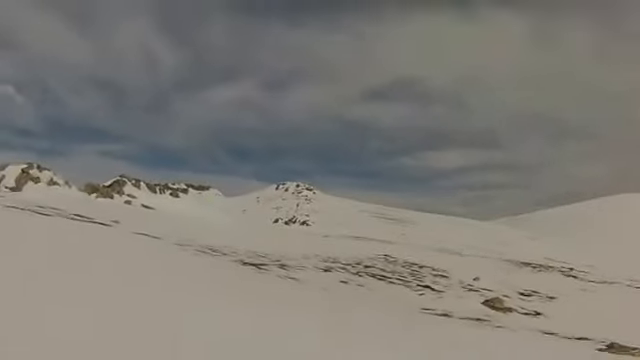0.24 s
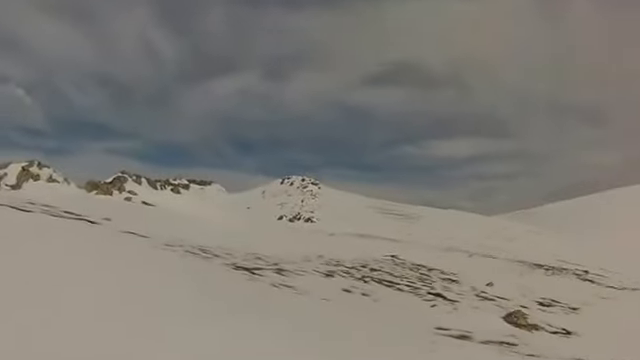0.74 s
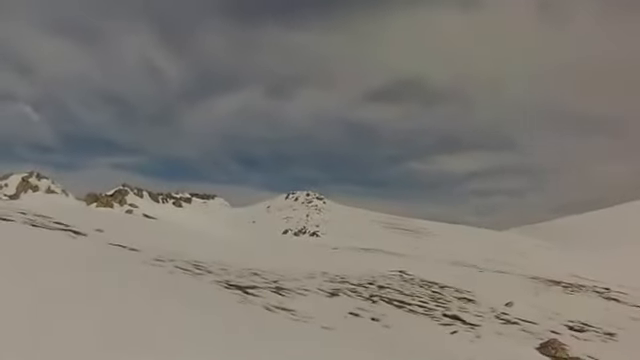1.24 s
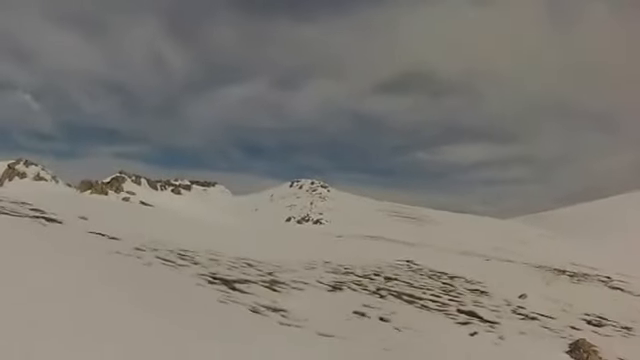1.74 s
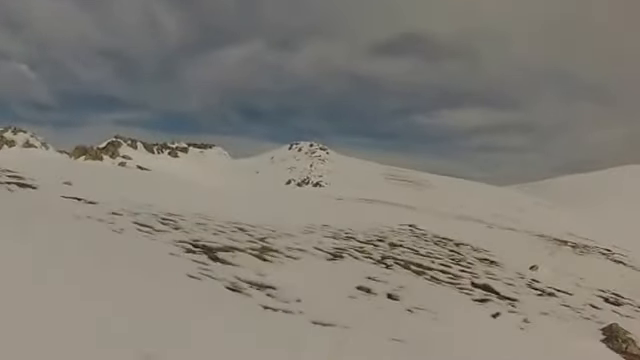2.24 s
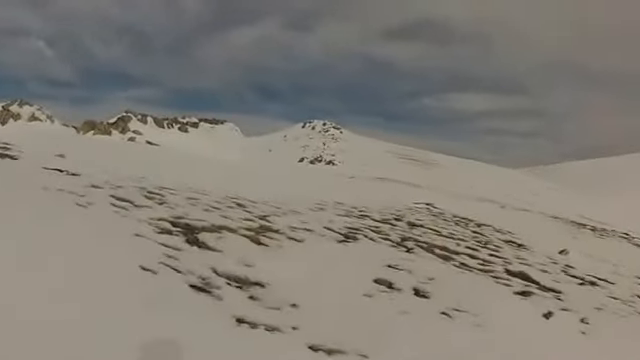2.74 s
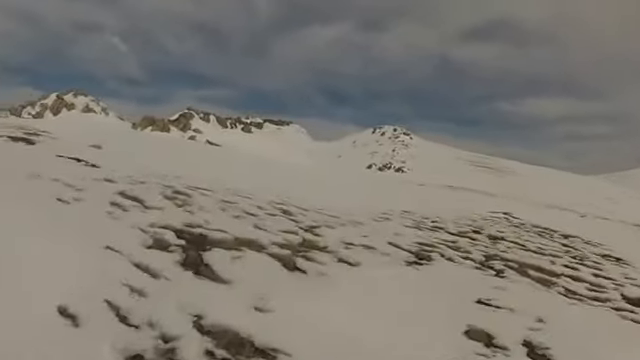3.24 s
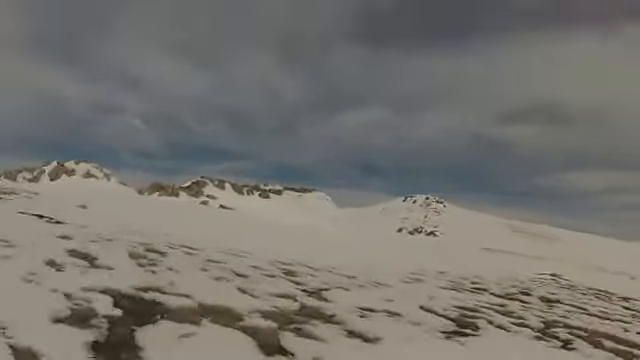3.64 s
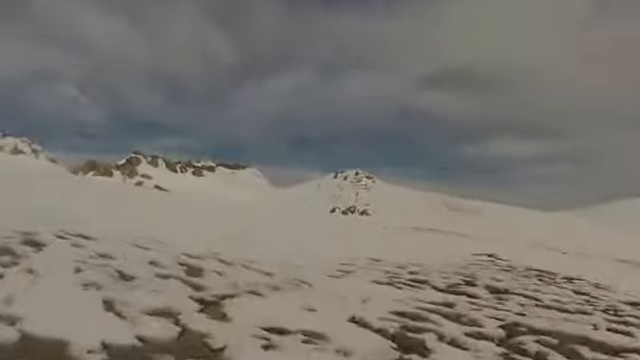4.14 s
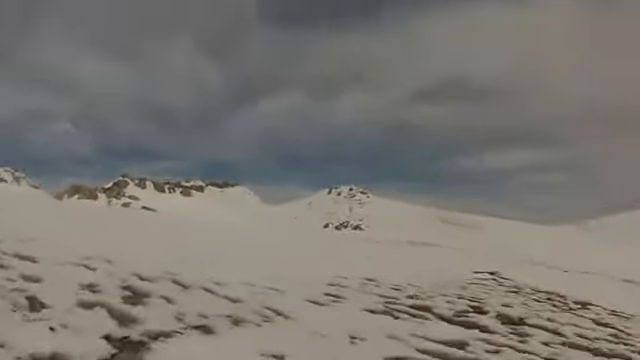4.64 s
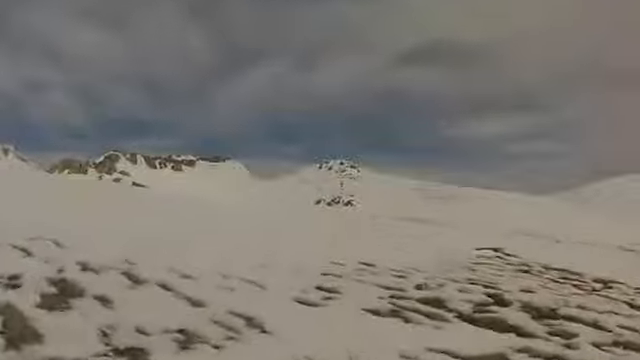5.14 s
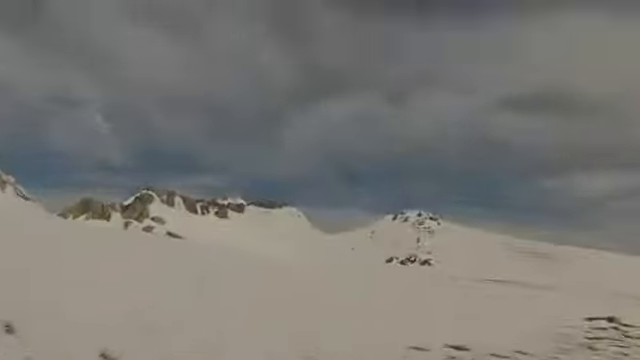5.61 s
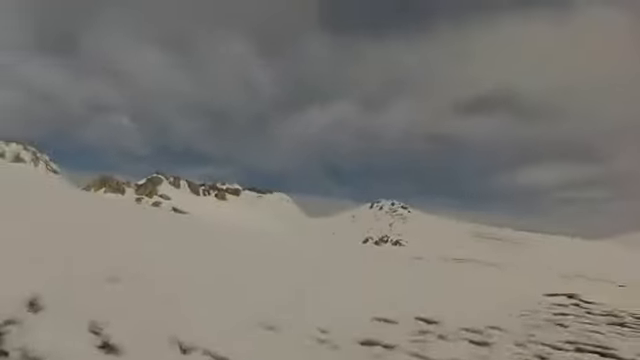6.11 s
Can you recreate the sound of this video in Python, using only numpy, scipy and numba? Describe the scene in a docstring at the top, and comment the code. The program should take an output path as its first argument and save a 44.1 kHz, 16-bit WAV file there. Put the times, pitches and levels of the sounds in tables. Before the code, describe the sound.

Boomy, muffled ride over hard snow: fat tyres drumming and crunching, mount jolting, plastic case rattling and clicking irregularly, with overloaded crackle on big bumps.

```python
"""A camera in a closed housing rides a wide-tyred bicycle over crusty snow for about six seconds.
From the start, shaped noise shakes the frame, noise-driven resonances drum in tyre and mount,
and random snaps crunch through the housing. Smooth jolts and ringing knocks soon join and go on throughout.
Gliding sines squeak near 0.6, 2.9 and 3.6 s. All along, a gain control moving in small steps
ducks after big swings and crackles while it moves."""
import sys
import numpy as np
from scipy import signal
from scipy.fft import rfft, irfft
from scipy.io import wavfile
from scipy.ndimage import uniform_filter1d
from numba import njit

SR = 44100
rng = np.random.default_rng(int(sys.argv[2]) if len(sys.argv) > 2 else 0)


def unload_audio(sound):
    """Save the sound as a 16-bit wav file, at the path given as the first command line argument."""
    columns = np.transpose(np.atleast_2d(sound))
    # keep every value between -1 and 1, then stretch to whole-number steps
    steps = np.round(np.clip(columns, -1, 1) * 32767)
    wavfile.write(sys.argv[1], SR, steps.astype(np.int16))


N = 280917

# Spectrum of the frame shake: (frequency [Hz], relative density [dB])
SHAKE_SPECTRUM = [(8, -17), (14, -3.5), (27, 2.5), (60, -6), (100, -15.5), (170, -25.5), (300, -58)]
# Level of the frame shake, with its lulls: (time [s], level [dB])
SHAKE_LEVEL = [(.04, -13.5), (.08, -30), (.2, -16), (.5, -17), (.6, -29), (.9, -15), (1.13, -18),
               (1.23, -24.5), (1.32, -15), (1.9, -21), (2.1, -17.5), (2.35, -18), (2.55, -26), (2.7, -22.5),
               (2.93, -22.5), (3.05, -13), (3.36, -19), (3.42, -23.5), (3.52, -17.5), (4.5, -20.5),
               (4.6, -20), (4.7, -17), (4.9, -21), (4.98, -26.5), (5.2, -21), (5.6, -16.5), (5.73, -16),
               (5.82, -19), (5.92, -20), (6.2, -17.5), (6.37, -21.5)]
# Resonances, two of the tyre then three of the mount: (frequency [Hz], pole width [Hz], level [dB])
MOUNT_MODES = [(122, 23, -6), (166.7, 40, 1), (209, 60, 0.5), (286.2, 89, -5.5), (398.4, 140, -17.5)]
# Level of the tyre drumming: (time [s], level [dB])
DRUM_LEVEL = [(.04, -25.5), (.08, -36), (.56, -33), (.65, -21), (.75, -27.5), (1.2, -33.5), (1.47, -22.5),
              (1.88, -39.5), (2, -27.5), (2.5, -32.5), (2.6, -18.5), (2.88, -20), (2.98, -24.5),
              (3.25, -26), (3.42, -34), (3.5, -15), (3.57, -26), (3.68, -19), (4.2, -36), (4.55, -21.5),
              (5, -25.5), (5.4, -22.5), (5.65, -22.5), (5.78, -39.5), (5.9, -24), (6.1, -27.5), (6.37, -25)]
# Level of the mount shudder at the usual bite: (time [s], level [dB])
SHUDDER_LEVEL = [(.05, -29.5), (.25, -28.5), (.55, -29), (.8, -24), (1.3, -27.5), (2, -26.5), (2.4, -26),
                 (2.62, -25.5), (2.75, -28), (3, -25.5), (3.9, -23), (4.15, -24.5), (4.55, -27.5),
                 (4.68, -22), (4.8, -25.5), (5.22, -24), (5.35, -24.5), (5.7, -26), (6.05, -21.5),
                 (6.37, -27)]
# How hard the tyres bite into the crust, heard as the crunch: (time [s], level [dB])
BITE_LEVEL = [(.04, -37), (.1, -43.5), (.55, -41.5), (.63, -31.5), (.72, -37.5), (.87, -40), (.98, -45.5),
              (1.25, -37.5), (1.5, -38), (1.85, -45), (2.02, -39), (2.18, -43.5), (2.6, -38), (2.72, -41.5),
              (3.15, -44.5), (3.25, -29), (3.32, -35), (3.41, -49), (3.5, -34), (3.64, -38.5), (3.73, -50),
              (3.9, -41.5), (4.15, -51.5), (4.32, -41.5), (4.42, -40), (4.55, -38), (4.78, -39),
              (4.88, -42.5), (5.22, -39.5), (5.35, -34), (5.6, -39.5), (5.78, -49.5), (5.88, -41.5),
              (5.96, -52.5), (6.2, -39), (6.37, -46.5)]
# Crispness of the crust at the usual bite: (time [s], upper-mode level [dB])
CRISPNESS = [(0, -11), (.6, -1.5), (1, -7.5), (2, -2.5), (3.1, -6.5), (3.3, -2.5), (3.55, -7), (3.66, 5),
             (3.8, 0), (4.4, -4), (4.7, -2), (5.1, -4.5), (5.35, -1), (5.6, -1), (6, 0.5), (6.37, -7.5)]
# Resonances of the housing, low to high: (frequency [Hz], pole width [Hz], level [dB])
HOUSING_MODES = [(494.7, 100, 2.5), (827.4, 210, 3), (1310.6, 396, -1.5), (1772, 250, -12.5),
                 (2202, 530, -8), (2606, 290, -23.5), (3390, 280, -30), (5950, 1300, -48)]
# Bumps that push the housing: (time [s], signed relative push, width at half height [ms])
JOLT_EVENTS = [(0.0118, -0.65, 2.9), (0.0333, -1.67, 1.87), (0.1153, 1, 2.35), (0.159, -1.04, 1.84),
               (0.2091, 0.99, 6.8), (0.322, -1.02, 2.4), (0.457, -0.73, 1.66), (0.658, 0.82, 1.93),
               (0.6785, 0.99, 4.7), (0.7301, -0.91, 1.75), (0.9066, -1.28, 5.2), (1.0246, 0.68, 13),
               (1.0821, -1.5, 1.5), (1.301, 1, 2.65), (1.494, -0.57, 7.3), (1.578, 0.72, 4.6),
               (1.612, -0.74, 1.87), (1.706, -1.5, 1.6), (1.7833, 0.76, 2.45), (1.9443, 0.54, 9),
               (1.9917, -0.71, 2.23), (2.0284, -0.81, 1.95), (2.1343, 1, 13.5), (2.352, -1.14, 12.6),
               (2.4344, 0.49, 2), (2.5778, -0.51, 1.5), (2.667, 0.62, 1.9), (2.6818, -0.93, 4.1),
               (2.856, -0.68, 2.08), (2.898, 0.91, 3.56), (3.3434, 1, 3.3), (3.4942, -0.51, 1.67),
               (3.5069, 1, 2.2), (3.5415, 0.72, 5.8), (3.6636, 0.92, 1.97), (3.6734, 0.72, 1.9),
               (3.692, -1.3, 14), (3.856, 0.77, 1.32), (3.943, 0.5, 2.35), (3.96, -1.33, 23),
               (4.011, 0.71, 12.6), (4.1068, 0.93, 1.39), (4.296, 0.38, 3.8), (4.332, -0.63, 6),
               (4.3497, -1.14, 1.26), (4.674, 0.17, 7.8), (4.6996, -0.29, 4.9), (4.8292, 0.79, 7),
               (4.8927, 0.76, 1.66), (4.9252, 0.66, 8.7), (5.073, 0.76, 2.7), (5.2133, -0.81, 1.6),
               (5.2323, -0.72, 3), (5.3545, -0.47, 2.3), (5.5352, 0.64, 1.8), (5.5732, 1, 1.58),
               (5.5828, -0.76, 1.85), (5.6614, -0.13, 6.8), (5.7441, -1.8, 11.8), (5.9189, 1, 4.9),
               (6.0198, 1, 1.46), (6.0801, 0.12, 2.5), (6.2789, 0.77, 7.8)]
# Camera knocking in its housing, upper and latch relative to the body modes:
# (time [s], body peak [dB], upper modes [dB], latch modes [dB], looseness [0-1])
KNOCK_EVENTS = [(0.0339, -17, -13, -14, 0.37), (0.1111, -21.5, -7.5, -35, 0.33),
                (0.1578, -25, -10, -26, 0.4), (0.175, -22, -6.5, -38, 0.58),
                (0.2054, -29.5, -11, -17, 0.46), (0.2453, -27.5, -10, -22, 0.22),
                (0.3197, -28.5, -1, -13.5, 0.46), (0.3391, -20, -5, -33, 0.38),
                (0.3738, -32, -8.5, -8, 0.2), (0.4559, -24.5, -5.5, -29, 0.51),
                (0.4698, -19, -13, -28, 0.2), (0.6476, -27.5, -14, -33, 0.9), (0.6636, -20, -5, -34, 0.38),
                (0.6729, -22.5, -5, -16, 0.43), (0.7287, -19, -4.5, -36, 0.23),
                (0.8994, -25.5, -9, -17, 0.87), (0.9542, -22.5, -12, -44, 0.25),
                (0.9652, -22, -6, -44, 0.31), (1.0784, -23.5, -9, -32, 0.24),
                (1.1159, -24, 1.5, -16.5, 0.23), (1.2971, -35, -2, -17, 0.2), (1.5589, -25.5, -18, -31, 0),
                (1.5708, -27, -5, -21, 0.5), (1.6102, -21, -10, -30, 0.43), (1.7025, -24, -6, -14, 0.3),
                (1.7799, -22, -2, -27, 0.33), (2.0253, -18, -16, -23, 0.24), (2.1166, -25.5, -19, -23, 0),
                (2.309, -26, -6, -45, 0.3), (2.4119, -21, -8.5, -46, 0.44), (2.4289, -26.5, -12, -34, 0.67),
                (2.4528, -30.5, -2, -20, 0.27), (2.8075, -31.5, -1, -24, 0.56),
                (2.9692, -28, -10, -23, 0.28), (3.0275, -33, -9, -14, 0.57),
                (3.3333, -16, -18.5, -41, 0.67), (3.4954, -15, -8.5, -38, 0.19),
                (3.5044, -16.5, -4.5, -20, 0.3), (3.5613, -27, -7, -35, 0.44), (3.6227, -25, 1, -32, 0.17),
                (3.6641, -13, -8, -34, 0.38), (3.8077, -24.5, -16, -54, 0.28),
                (3.8526, -19.5, -8.5, -46, 0.28), (4.1046, -15, -5, -23, 0.31),
                (4.1163, -33.5, -1, -6, 0.5), (4.155, -37.5, -2, -8, 0), (4.2428, -26.5, -5.5, -41, 0.28),
                (4.2926, -24.5, -9.5, -31, 0.27), (4.3485, -13.5, -3, -47, 0.27),
                (4.364, -18, -1.5, -39, 0.41), (4.4179, -35, -3, -5, 0.16), (4.7117, -18.5, -8, -42, 0.18),
                (4.7762, -21, -28, -47, 0.12), (4.7965, -26, -11.5, -36, 0.8), (4.8793, -30, 2.5, -20, 0.2),
                (4.8893, -19, -15, -31, 0.23), (4.9282, -24, -9, -18, 0.25), (4.945, -21.5, -2, -41, 0.8),
                (4.9955, -31, -0.5, -13, 0.07), (5.0125, -26, -14, -39, 0.37), (5.1168, -30, -8, -19, 0.36),
                (5.1552, -30.5, -6, -38, 0.33), (5.3512, -22.5, -7, -41, 0.27),
                (5.5303, -25.5, -6, -31, 0.76), (5.5797, -14.5, -4.5, -39, 0.29),
                (5.5942, -16, 0, -26, 0.23), (5.6461, -17.5, -12, -23, 0.23), (5.6845, -25.5, -8, -34, 0.3),
                (5.7169, -29, -2.5, -25, 0.66), (5.8087, -30, -4, -42, 0.32),
                (5.9429, -34.5, -0.5, -14, 0.44), (6.0181, -21, -3.5, -19, 0.63),
                (6.0781, -25.5, -7, -25, 0.18), (6.1799, -32, -21, -28, 0.2),
                (6.2053, -26.5, -14, -31.5, 0.9), (6.3026, -19, -3.5, -39, 0.35)]
# Two ends of the range of faint random knocks:
# (body peak [dB], upper modes [dB], latch modes [dB], looseness [0-1])
RATTLE_RANGE = [(-47.5, -7.5, -21, 0.5), (-37.5, -4.5, -29.5, 0)]
# Squeaks of packed snow: (time [s], length [s], first pitch [Hz], last pitch [Hz], level [dB])
SQUEAK_EVENTS = [(0.596, 0.0089, 2170, 1780, -25), (2.915, 0.06, 1530, 1440, -41.5),
                 (3.587, 0.037, 2195, 2100, -40)]

USUAL_BITE_DB = -41.5
SHUDDER_PER_DB, CRISP_PER_DB = 0.73, -0.07  # dB per dB of bite; a light bite sounds crisper
KNEE, STEP_DB = .33, 0.4678  # amplitude where ducking starts; size of one gain step
EDGE_HZ = 15700  # upper band limit


def amp(db):
    """Turn decibels into an amplitude factor."""
    return 10 ** (np.asarray(db) / 20)


def evened(x):
    """Bring a signal to rms 1."""
    return x / np.sqrt(np.mean(x ** 2) + 1e-20)


def curve(points):
    """Level in dB at every sample, drawn straight between the points of a table."""
    return np.interp(np.arange(N) / SR, *np.transpose(points))


def drift(ms):
    """Smooth slow chance, rms 1: noise averaged twice over ms."""
    size = int(ms * SR / 1000) + 1
    once = uniform_filter1d(rng.standard_normal(N), size)
    return evened(uniform_filter1d(once, size))


def flicker(ms, db):
    """Random gain that changes within about ms, with an rms swing in dB."""
    return amp(db * drift(ms))


def follow(db, per_db):
    """Gain that moves with the bite of the tyres."""
    return amp(db + per_db * (curve(BITE_LEVEL) - USUAL_BITE_DB))


def ring(x, modes):
    """Steep two-pass resonances side by side, neighbours in opposite sign."""
    out = 0
    for k, (hz, width, db) in enumerate(modes):
        pole = np.exp((2j * np.pi * hz - np.pi * width) / SR)
        resonator = [1 - abs(pole)], [1, -pole]
        once = signal.lfilter(*resonator, x + 0j)
        twice = signal.lfilter(*resonator, once).real
        out = out + (-1) ** k * amp(db) * twice
    return out


def shake():
    """Low lumpy shaking of the frame and wind on the housing, as one shaped noise."""
    hz = np.fft.rfftfreq(N, 1 / SR)
    f, db = np.transpose(SHAKE_SPECTRUM)
    gain = amp(np.interp(np.log(hz + 1), np.log(f), db, -90, -90))
    rumble = evened(irfft(rfft(rng.standard_normal(N)) * gain, N))
    return amp(curve(SHAKE_LEVEL)) * flicker(ms=35, db=1.0) * rumble


def shudder():
    """Tyre lugs and ruts, as uneven bursts of noise, keep tyre and mount ringing."""
    drive = rng.standard_normal(N) * flicker(ms=12, db=3.5)
    drum = amp(curve(DRUM_LEVEL)) * evened(ring(drive, MOUNT_MODES[:2]))
    mount = follow(curve(SHUDDER_LEVEL), SHUDDER_PER_DB) * evened(ring(drive, MOUNT_MODES[2:]))
    return drum - mount


def crunch():
    """Snow crust breaks in many small snaps over a fine hiss; crisp crust rings the upper modes."""
    size = amp(3.1 * np.minimum(rng.exponential(1, N), 4.5)) * rng.choice([-1., 1.], N)
    snaps = size * (rng.random(N) < 1100 / SR)  # about 1100 a second
    hiss = 0.62 * rng.standard_normal(N)
    drive = (evened(snaps) + hiss) * flicker(ms=6, db=2.0)  # clumped
    # a little passes the seals without the colour of the housing
    leak = follow(-73.5, .5) * signal.lfilter([1], [1, -.8], drive)

    dull = ring(drive, HOUSING_MODES[:3])
    crispness = follow(curve(CRISPNESS), CRISP_PER_DB) * flicker(ms=50, db=3.5)
    walls = dull - crispness * ring(drive, HOUSING_MODES[3:6])
    # the walls stop the treble
    walls = signal.sosfilt(signal.butter(4, 2750, fs=SR, output="sos"), walls)
    top = amp(-8) * ring(drive, HOUSING_MODES[6:7])
    return amp(curve(BITE_LEVEL)) * ((walls + top) / np.std(dull)) + leak


def held():
    """A jolt presses the housing against its mount and stills the shaking for a moment."""
    s, size, _ = np.transpose(JOLT_EVENTS)
    press = np.bincount(np.round(s * 1000).astype(int), abs(size), int(N / SR * 1000) + 2)  # one bin per ms
    spread = np.exp(-(np.arange(-40, 41) / 7.4) ** 2)
    press = np.convolve(press, spread, "same")
    return amp(-14 * np.interp(np.arange(N) / SR * 1000, np.arange(len(press)), press))


def jolts():
    """Smooth bell-shaped pushes; the short ones leave the mount ringing."""
    push, t = np.zeros(N + 4000), np.arange(-2000, 2000) / SR
    for s, size, ms in JOLT_EVENTS:
        at = np.clip(round(s * SR), 2000, N)
        widths = (t + at / SR - s) * 1000 / ms
        push[at - 2000:at + 2000] += size * np.exp(-4 * np.log(2) * widths ** 2)
    push = signal.lfilter(*signal.butter(1, 18, "high", fs=SR), push[:N])
    return push + 1.1 * ring(push, MOUNT_MODES)


def rattle(count):
    """Rows of faint knocks at random moments."""
    u = rng.random((count, 5))
    low, high = np.array(RATTLE_RANGE)
    return np.column_stack([u[:, 0] * N / SR, low + (high - low) * u[:, 1:]])


def knocks():
    """One blow and a short chatter, longer when loose, ring four groups of housing modes."""
    rows = np.vstack([KNOCK_EVENTS, rattle(count=45)])
    s, db, upper_db, latch_db, loose = np.transpose(rows)[:, :, None]
    loose, t = np.clip(loose, .02, 1), np.arange(1200) / SR
    u = t / (0.0049 * loose)
    blows = 0.63 * loose * rng.standard_normal((len(s), 1200)) * u * np.exp(-u)  # chatter
    blows[:, :1] += 1 - loose  # the blow itself

    parts = HOUSING_MODES[:2], HOUSING_MODES[2:4], HOUSING_MODES[4:6], HOUSING_MODES[6:]
    groups = [ring(blows, modes) for modes in parts]
    lower, body, upper, latch = (g / abs(g).max(axis=1, keepdims=True) for g in groups)
    mix = body - amp(-7.0) * lower + amp(upper_db) * upper + amp(latch_db) * latch
    out = np.zeros(N + 1200)
    for at, sound in zip(s[:, 0], amp(db) * mix):
        out[round(at * SR):][:1200] += sound
    return out[:N]


def squeaks():
    """Packed snow squeaks as short gliding sines that swell and fade."""
    out = np.zeros(N)
    for s, length, first_hz, last_hz, db in SQUEAK_EVENTS:
        hz = np.linspace(first_hz, last_hz, round(length * SR))
        tone = np.sin(2 * np.pi * np.cumsum(hz) / SR)
        out[round(s * SR):][:len(hz)] += amp(db) * np.hanning(len(hz)) * tone
    return out


def scene():
    """Mix the rolling bed with its jolts, knocks and squeaks, alike in both channels."""
    ruts = flicker(ms=53, db=1.65)  # uneven ground shakes the whole bicycle at once
    rolling = ruts * (held() * (shake() + shudder()) + crunch())
    return np.tile(rolling + jolts() + knocks() + squeaks(), (2, 1))


@njit
def ducking(x, knee, fall_db, rise_db):
    """Gain in dB: falls faster the further the output is over the knee, else creeps back to 0."""
    out, g = np.zeros(len(x)), 0.
    for n in range(len(x)):
        over = abs(x[n]) * 10 ** (g / 20) / knee
        if over > 1:
            g = g - fall_db * (over - .7)
        else:
            g = min(g + rise_db, 0.)
        out[n] = g
    return out


def record(dry):
    """Each channel follows the gain in whole steps, a little out of step; then overload and band limit."""
    # the fall rate of 1500 dB/s scales with the overshoot; the rise is 70 dB/s
    wanted = ducking(dry[0], KNEE, 1500 / SR, 70 / SR) / STEP_DB
    falling = np.gradient(wanted) < 0
    dither = .5 * falling * drift(ms=.4)  # uneven steps on the way down
    hunting = 0.64 * drift(ms=6)  # the gain never rests: it ticks between neighbouring steps
    apart = 0.056 * drift(ms=60)
    steps = np.round(wanted + dither + hunting + [apart, -apart])
    steps[1] += np.round(.33 * drift(ms=45))  # at times one channel sits a whole step off
    out = np.clip(dry * amp(STEP_DB * steps), -1, 1)
    out = signal.lfilter(*signal.butter(1, 14000, fs=SR), out)  # the input stage softens each step
    band_limit = signal.firwin(511, EDGE_HZ, window=("kaiser", 9), fs=SR)
    return signal.oaconvolve(out, band_limit[None], "same")


dry = scene()
out = record(dry)
unload_audio(out)
```